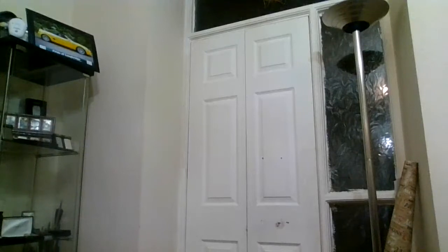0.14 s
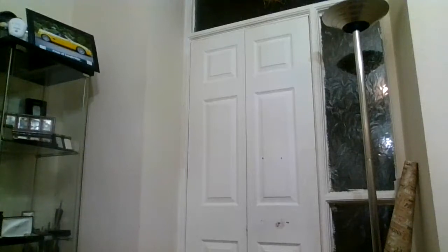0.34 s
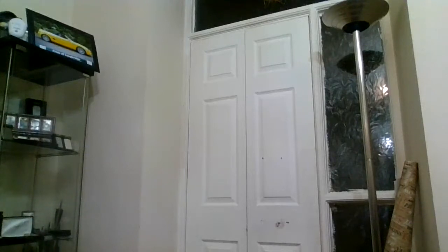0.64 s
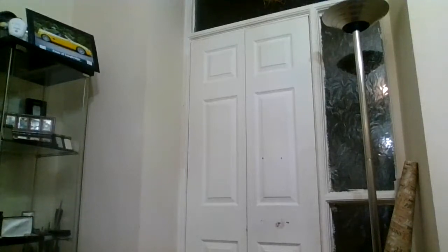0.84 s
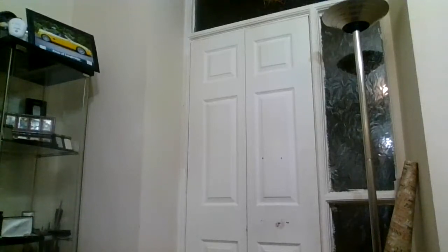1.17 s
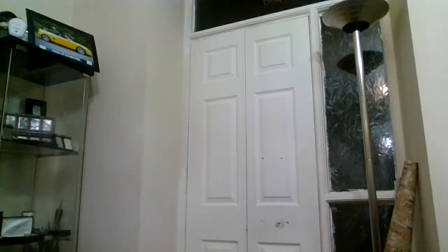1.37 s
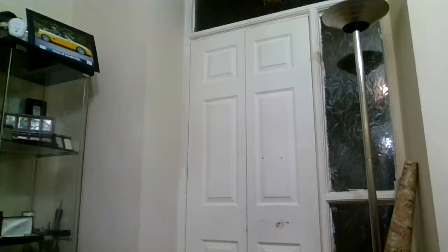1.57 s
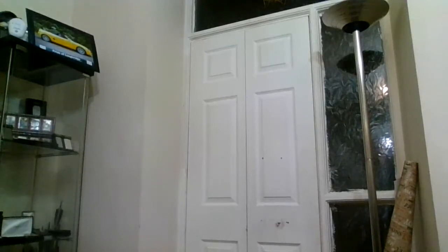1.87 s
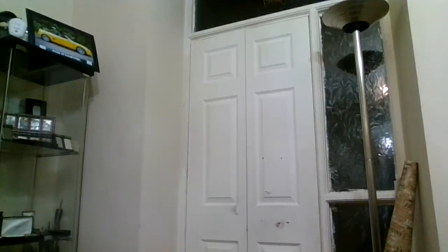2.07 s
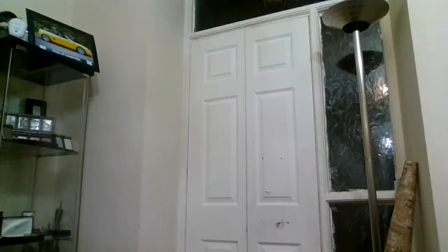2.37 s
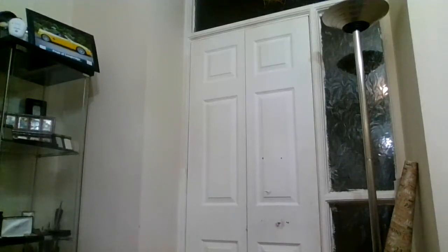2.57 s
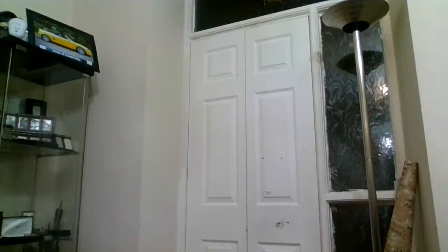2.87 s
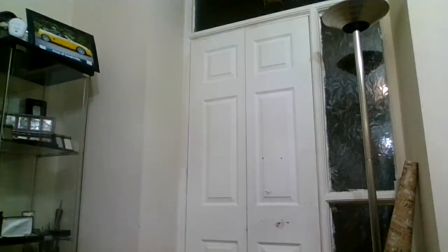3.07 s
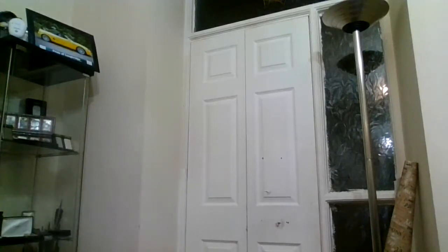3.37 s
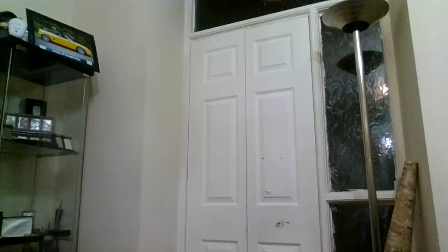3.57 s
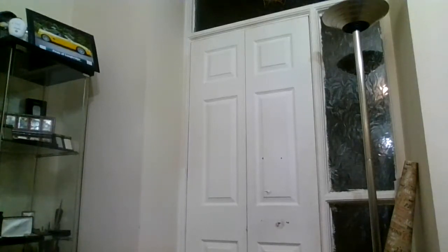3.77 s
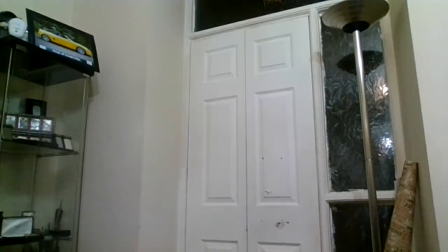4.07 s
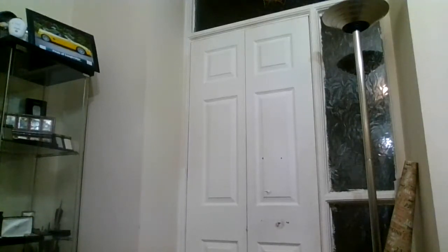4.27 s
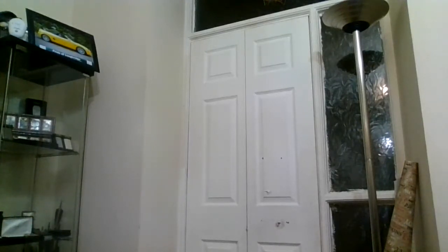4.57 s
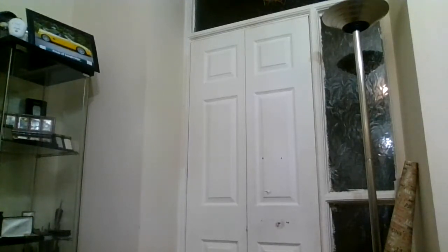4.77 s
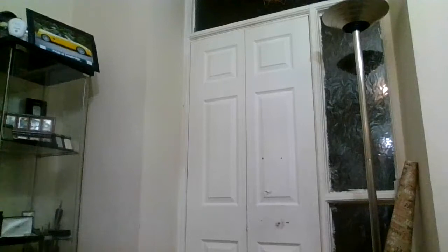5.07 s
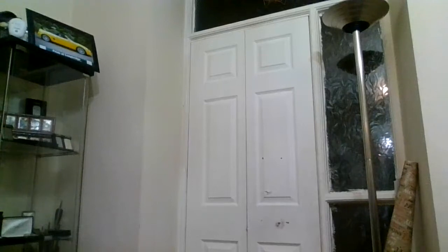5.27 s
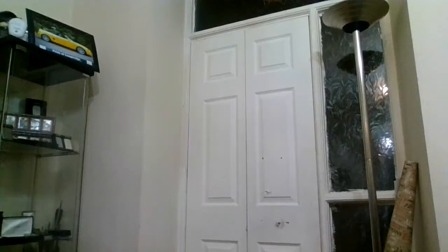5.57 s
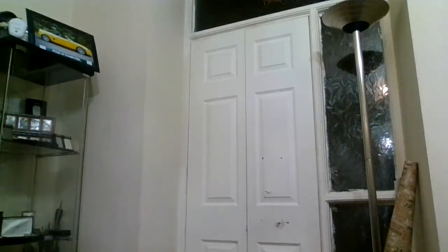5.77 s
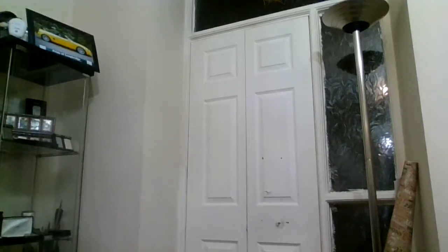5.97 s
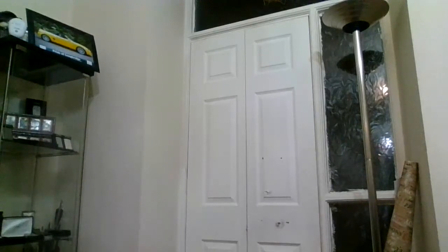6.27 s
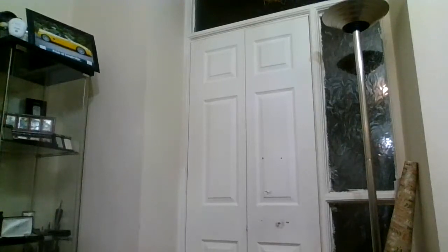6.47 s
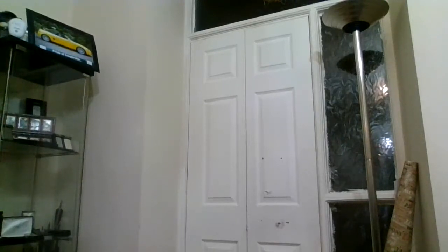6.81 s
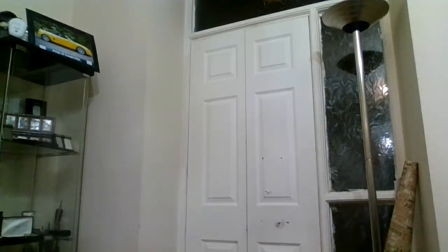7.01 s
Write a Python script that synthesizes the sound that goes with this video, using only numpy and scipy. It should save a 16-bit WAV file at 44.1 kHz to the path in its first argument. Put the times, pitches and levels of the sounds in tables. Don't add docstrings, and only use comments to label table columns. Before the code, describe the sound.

Close microphone in a small, bare, live room with faint hiss and thin high whine. Rubber creaks softly, snaps, and almost at once a dart slams a wooden door with a huge distorted crack and hollow ringing. It drops to the hard floor, bounces, rolls with a steely jingle and skids to rest. Then quiet cloth rustle, board creaks, small clicks and dull knocks.

```python
import sys
import numpy as np
from scipy import signal
from scipy.fft import rfft, irfft, next_fast_len
from scipy.io import wavfile
from scipy.ndimage import uniform_filter1d, map_coordinates

SR = 44100
rng = np.random.default_rng(int(sys.argv[2]) if len(sys.argv) > 2 else 0)


def voltage_ratio(decibels):
    exponent = np.asarray(decibels, float) / 20
    return 10 ** exponent


def master_out(mix):
    frames = np.transpose(np.atleast_2d(mix))
    ceiling = np.clip(frames, -1, 1)
    pcm = np.round(ceiling * 32767).astype(np.int16)
    wavfile.write(sys.argv[1], SR, pcm)


N = 314962

# (frequency [Hz], level [dB per Hz])
HISS = [(10, -20), (25, 0), (70, -3), (250, -12), (800, -20), (2500, -24.5), (8000, -26), (13000, -23),
        (15700, -21), (16500, -90)]
HISS_DB = -61.3
# (frequency [Hz], level [dB rms])
WHINE = [(8000, -89), (10002, -85), (13173, -91), (14002, -82), (14664, -85), (14804, -85), (14928, -86),
         (15052, -88)]
# (frequency [Hz], time to fall 60 dB [s])
ROOM_DECAY = [(60, .4), (250, .38), (900, .5), (3800, .47), (11000, .4), (15500, .33)]
TOP_HZ = 15700

STRETCH = [
    (.56, -49, -1, .03),
    (1.59, -52, 0, .02),
    (1.856, -49, -2, .01),
]
BAND_SLAP = [
    (1.896, -30, 2, .012),
    (1.9068, -18, 1, .001),
    (1.9225, -12, -7, .003),
    (1.932, -13, -5, .005),
]
STRIKE = (2.0438, 19.1, -2, .018)
DART_BOUNCES = [
    (2.408, -6, 5, .0006),
    (2.426, -5, 0, .001),
    (2.445, -8, -8, .003),
    (2.519, -10, -3, .002),
]
TUMBLE = [
    (2.667, -38, 19, .003),
    (2.704, -26.2, 14, .0004),
    (2.786, -22, 4, .002),
    (2.825, -21, 0, .01),
    (2.985, -30, 7, .01),
    (3.06, -32, 7, .01),
    (3.155, -36, 10, .005),
]
HEELS = [
    (4.0, -51, 13, .004),
    (4.303, -55, 14, .006),
    (4.368, -55, 18, .01),
    (4.42, -66, 21, .01),
]
GEAR_BUMPS = [(.82, -55, 12, .01), (1.11, -76, 22, .02), (3.56, -52, 3, .02), (3.63, -53, -1, .004),
              (3.641, -48, -3, .001), (4.259, -45, -1, .02), (4.58, -47, -3, .02), (4.757, -64, 19, .01),
              (4.816, -40.5, 7, .005), (5.035, -52, 1, .005), (5.673, -34, 7, .001), (5.686, -37, -9, .002)]
GEAR_CLICKS = [(3.35, -62, 8, .01), (3.458, -47, -13, .003), (3.87, -52, -20, .005), (4.51, -39, -7, .03),
               (5.5, -48, -9, .03), (5.76, -44, -20, .004), (5.87, -38, -15, .02), (5.921, -45, 2, .003),
               (5.972, -39, -3, .004), (5.987, -24, -4, .0004), (6.176, -34, -15, .001),
               (6.22, -33, -2, .006), (6.27, -38, -10, .008), (6.38, -35, -18, .004), (6.402, -23, 7, .001),
               (7.1, -49, -3, .005), (7.124, -35, 10, .001)]
HANDLE_KNOCKS = [
    (6.16, -52, 10, .01),
    (6.353, -38, 8, .003),
    (6.413, -18, -1, .001),
    (6.44, -15.5, -7, .002),
    (6.534, -25, -6, .003),
    (6.544, -18, -5, .001),
    (7.066, -47, 2, .003),
]

BAND_BODY = [(1200, 150, 6), (12300, 600, 4)]
PANEL_BODY = [(1750, 350, 3), (9500, 2500, 3)]
DART_BODY = [(480, 40, 4), (680, 45, 5), (1150, 120, 8), (4290, 500, 5), (13900, 500, 3)]
FLAT_DART_BODY = [(480, 40, 4), (680, 60, 5), (850, 90, 5), (4290, 700, 4), (13900, 500, 4)]
GEAR_BODY = [(1150, 200, 1.5), (4300, 700, 2.5), (13900, 600, 2.5)]
STEEL = [(9390, 130, -3.5), (11990, 130, -6), (13900, 300, 0)]

# (frequency [Hz], level [dB], time to fall 60 dB [s])
DOOR_MODES = [(98, -45, 2.2), (210, -9, .55), (275, -13, .5), (345, -12, .5), (490, -8, .5), (538, 0, .56),
              (625, -9, .5), (673, -10, .65)]
# (time [s], length [s], relative pressure)
AIR_PUSHES = [
    (2.0439, .0006, -12),
    (2.0444, .0013, 40),
    (2.0452, .0009, -62),
    (2.046, .008, 40),
    (2.0502, .019, -38),
    (2.064, .04, -2),
]
# (time [s], spread [s], low edge [Hz], high edge [Hz], level
# [dB])
SPLITS = [
    (2.045, .006, 5000, 15500, -22),
    (2.116, .011, 12200, 15600, -13),
    (2.394, .008, 5200, 6900, -44),
]

# (time [s], level [dB])
LOADS = [(3.35, -64), (3.71, -61), (3.9, -64), (4.33, -46), (4.38, -41), (4.43, -42), (4.55, -45),
         (4.62, -53), (4.75, -56), (4.9, -53), (4.96, -47), (5.28, -62), (5.5, -62)]
# (frequency [Hz], level [dB per Hz])
GROAN = [(20, -20), (50, -3), (90, 0), (140, -6), (300, -40)]
# (time [s], level [dB])
JINGLES = [(2.55, -31), (2.714, -35), (2.804, -35), (2.86, -41), (2.95, -40), (3.0, -38), (3.094, -41),
           (3.165, -44), (6.418, -34), (6.49, -38), (6.554, -43)]

# (time [s], friction [dB])
SLIDE = [
    (2.6, -41),
    (2.7, -42),
    (2.77, -32),
    (2.86, -36),
    (2.99, -36),
    (3.12, -41),
    (3.24, -45),
    (3.33, -55),
    (3.47, -66),
]
# (time [s], friction [dB])
DRAG = [
    (6.15, -65),
    (6.19, -42),
    (6.28, -41),
    (6.4, -38),
    (6.5, -55),
]
# (time [s], effort [dB])
CLOTHES = [(3.3, -70), (3.5, -61), (3.8, -66), (4.1, -60), (4.7, -63), (5.0, -60), (5.3, -72), (5.6, -62),
           (5.9, -53), (6.15, -75), (6.75, -68), (6.95, -59), (7.14, -60)]
# (frequency [Hz], level [dB per Hz])
SCRAPE = [(200, -40), (350, -8), (500, -6), (640, 0), (730, -6), (830, 1), (970, -5), (1140, 0), (1600, -4),
          (2400, -14), (4000, -60)]
GRIT = [(1200, -40), (2000, -3), (4200, 0), (6500, -4), (8500, -12), (11000, -60)]
RUSTLE = [(5000, -50), (7500, -4), (10000, -2), (13500, 0), (15600, -4)]
RUMBLE = [(40, -30), (100, -2), (300, -2), (470, 1.5), (700, -40)]
# (scrape [dB], grit [dB], rustle [dB], rumble [dB])
SLIDE_MIX = [-1, 2.1, -1.2, -18]
DRAG_MIX = [0, -5, -24, -28]
CLOTH_MIX = [-6, -2, 2.1, -6]
# (scrape [dB/s], grit [dB/s], rustle [dB/s], rumble [dB/s])
SLOWING = [0, -16, -20, 2.5]


def unit(x):
    return x / np.sqrt(np.mean(x ** 2) + 1e-20)


def along(points, hz):
    f, v = np.transpose(points)
    return np.interp(np.log(hz + 1), np.log(f + 1), v)


def gains(rows):
    s, db = np.transpose(rows)
    return np.sqrt(np.interp(np.arange(N) / SR, s, voltage_ratio(db) ** 2, 0, 0))


def wobble(rate):
    knots = rng.standard_normal(int(N * rate / SR) + 4)
    return map_coordinates(knots, [np.arange(N) * rate / SR])


def filtered(x, response):
    m = next_fast_len(N + SR)
    return irfft(rfft(x, m) * response(np.fft.rfftfreq(m, 1 / SR)), m)[..., :N]


def noise(spectrum):
    return unit(filtered(rng.standard_normal(N), lambda hz: voltage_ratio(along(spectrum, hz))))


def add(track, s, sound):
    part = track[round(s * SR):][:len(sound)]
    part += sound[:len(part)]


def swells(rows, rise, t60):
    power, t = np.zeros(N), np.arange(-SR // 20, SR) / SR
    shape = voltage_ratio(-np.where(t < 0, -20 * t / rise, 120 * t / t60))
    for s, db in rows:
        add(power, s + t[0], voltage_ratio(2 * db) * shape)
    return np.sqrt(power)


def contact(body, db, thud_db, knock_db, sizzle_db, rise):
    length = 2 * SR // 3 if db > -26 else SR // 3
    hz, frame, z = signal.stft(rng.standard_normal(length), SR, nperseg=512)
    thud, knock, sizzle = db + thud_db, db + knock_db, db + sizzle_db
    colour = along([(40, thud - 6), (130, thud - .5), (340, thud - .6), (560, knock + 1.5),
                    (1350, .75 * knock + .25 * db), (2300, db), (6500, db),
                    (8500, sizzle), (14500, sizzle), (16000, sizzle - 8)], hz)
    for centre, width, lift_db in body:
        colour = colour + lift_db / (1 + ((hz - centre) / width) ** 2)
    wall = 4 * np.exp(-((frame - .016) / .006) ** 2) * (hz[:, None] / 16000)
    patches = uniform_filter1d(rng.standard_normal(z.shape), size=7, axis=0)
    patches = 2.2 * unit(uniform_filter1d(patches, size=6, axis=1))
    decay = 60 * frame / along(ROOM_DECAY, hz)[:, None]
    level = colour[:, None] + wall + patches - .5 - decay
    tail = signal.istft(z * voltage_ratio(level), SR, nperseg=512)[1]
    t = np.arange(len(tail)) / SR
    lumps = map_coordinates(rng.standard_normal(300), [t * 280])
    echoes = voltage_ratio(1.8 * lumps * np.exp(-t / .06))
    onset = 1 - np.exp(-t / rise) + .45 * np.exp(-t / .0015)
    return voltage_ratio(-1.8) * tail * echoes * onset


def contacts(body, rows, thud_db, sizzle_db, follows=0):
    out = np.zeros(N)
    for s, db, knock_db, rise in rows:
        sizzle = sizzle_db + follows * knock_db
        add(out, s, contact(body, db, knock_db + thud_db, knock_db, sizzle, rise))
    return out


def hiss_and_whine():
    out, t = voltage_ratio(HISS_DB) * noise(HISS), np.arange(N) / SR
    for hz, db in WHINE:
        out += voltage_ratio(db + 3 + 1.5 * wobble(6)) * np.sin(2 * np.pi * hz * t)
    return out


def rubber_band():
    creaks = contacts(GEAR_BODY, STRETCH, -5.1, -18.1)
    return creaks + contacts(BAND_BODY, BAND_SLAP, -8.1, 1.5, -.4)


def handled_gear():
    bumps = contacts(GEAR_BODY, GEAR_BUMPS, 5.5, 1.1)
    clicks = contacts(GEAR_BODY, GEAR_CLICKS, -16.1, -2.5)
    return bumps + clicks + contacts(GEAR_BODY, HANDLE_KNOCKS, -8.5, -6.5)


def door():
    out, t = contacts(PANEL_BODY, [STRIKE], -4.1, 1.5), np.arange(2 * SR) / SR
    for hz, db, t60 in DOOR_MODES:
        flutter = np.cumsum(rng.standard_normal(len(t))) * .038
        beats = 3.1 * wobble(22)[:len(t)]
        tone = np.sin(2 * np.pi * hz * t + flutter) * (1 - np.exp(-t / .03))
        add(out, STRIKE[0], voltage_ratio(db + 6 + beats - 60 * t / t60) * tone)
    return out


def air_shove():
    out, t = np.zeros(N), np.arange(SR) / SR
    for s, length, pressure in AIR_PUSHES:
        push = t[t < length]
        add(out, s, pressure * (1 - np.exp(-push / .0007)) * (1 - push / length))
    return out


def channel_split():
    out, t = np.zeros(N), np.arange(-SR // 20, SR // 20) / SR
    for s, spread, low_hz, high_hz, db in SPLITS:
        band = signal.butter(6, [low_hz, high_hz], "bandpass", fs=SR, output="sos")
        burst = unit(signal.sosfilt(band, rng.standard_normal(len(t))))
        add(out, s + t[0], voltage_ratio(db) * burst * np.exp(-(t / spread) ** 2))
    return np.array([out, -out])


def boards():
    bounce = np.sin(2 * np.pi * np.cumsum(24 + 3 * wobble(8)) / SR)
    frame_shake = swells([(STRIKE[0] + .06, -19)], rise=.004, t60=1.0)
    flex = frame_shake + swells(LOADS, rise=.03, t60=.3)
    return flex * (voltage_ratio(3) * bounce + voltage_ratio(-11) * noise(GROAN))


def dart():
    bounces = contacts(DART_BODY, DART_BOUNCES, -12.1, -2.1, .5)
    return bounces + contacts(FLAT_DART_BODY, TUMBLE, -17.1, -5.5)


def steel_response(hz):
    total = 0
    for centre, width, db in STEEL:
        total = total + voltage_ratio(db) * hz * width / np.abs(centre * centre - hz * hz + 1j * hz * width)
    return total ** 2


def shaft():
    ringing = filtered(rng.standard_normal(N), steel_response)
    jingle = unit(voltage_ratio(3.1 * wobble(35)) * ringing)
    return voltage_ratio(-1) * swells(JINGLES, rise=.012, t60=.3) * jingle


def texture(depth_db, rate, colour):
    return unit(voltage_ratio(depth_db * wobble(rate)) * noise(colour))


def friction():
    slowing = voltage_ratio(np.outer(SLOWING, np.clip(np.arange(N) / SR - 2.8, -1, 1)))
    motions = [slowing * gains(SLIDE), gains(DRAG), gains(CLOTHES)]
    mixes = [SLIDE_MIX, DRAG_MIX, CLOTH_MIX]
    power = sum((voltage_ratio(mix)[:, None] * motion) ** 2 for mix, motion in zip(mixes, motions))
    scrape, grit, rustle, rumble = np.sqrt(power)
    rough = scrape * texture(2.5, 40, SCRAPE) + grit * texture(1.5, 60, GRIT)
    return rough + rustle * texture(1.2, 40, RUSTLE) + rumble * texture(2.5, 9, RUMBLE)


def footsteps():
    return contacts(GEAR_BODY, HEELS, 12.5, 6.1)


def scene():
    sound = hiss_and_whine() + rubber_band() + handled_gear() + door() + boards()
    sound += dart() + shaft() + friction() + footsteps()
    push = air_shove()
    hearing = 1 / (1 + (push / 4.5) ** 2)
    return np.tile(np.tanh(push / 7) + sound * hearing, (2, 1))


def roll_off(x):
    return signal.sosfilt(signal.butter(12, 15690, fs=SR, output="sos"), x)


def record(dry):
    flat = np.clip(dry, -.93, .97)
    limited = filtered(flat, lambda hz: hz < TOP_HZ)
    mix = np.clip(limited + channel_split(), -1, 1)
    return roll_off(mix)


dry = scene()
out = record(dry)
master_out(out)
```